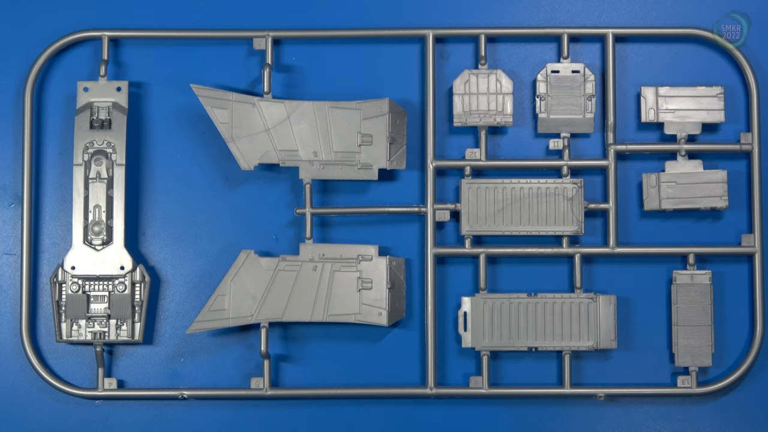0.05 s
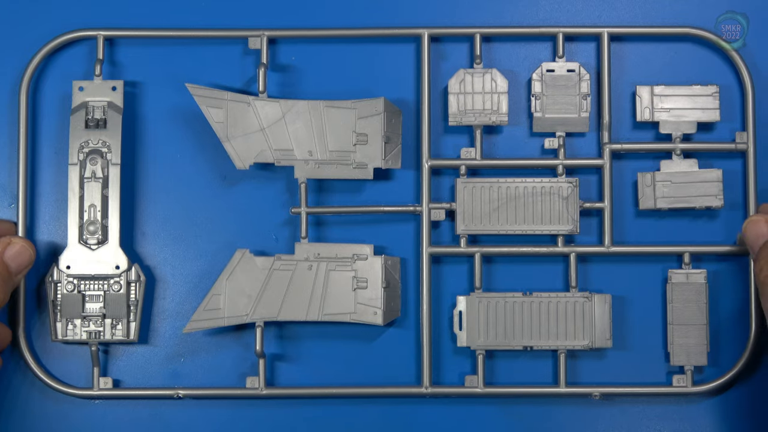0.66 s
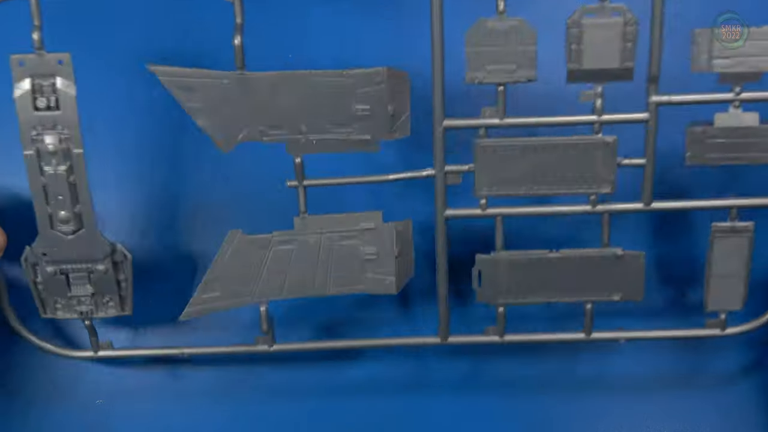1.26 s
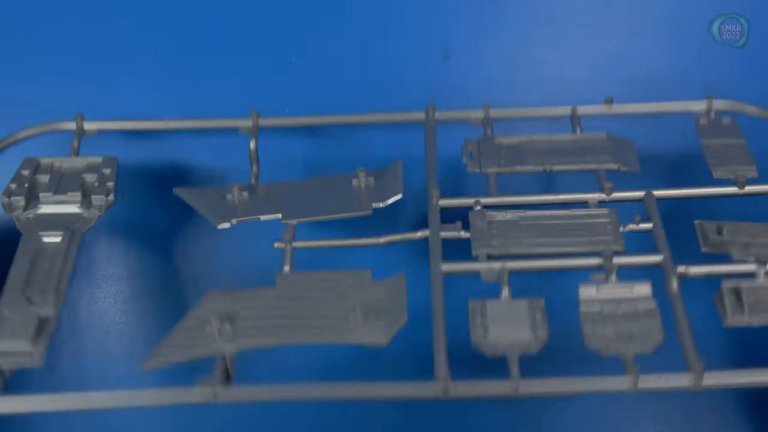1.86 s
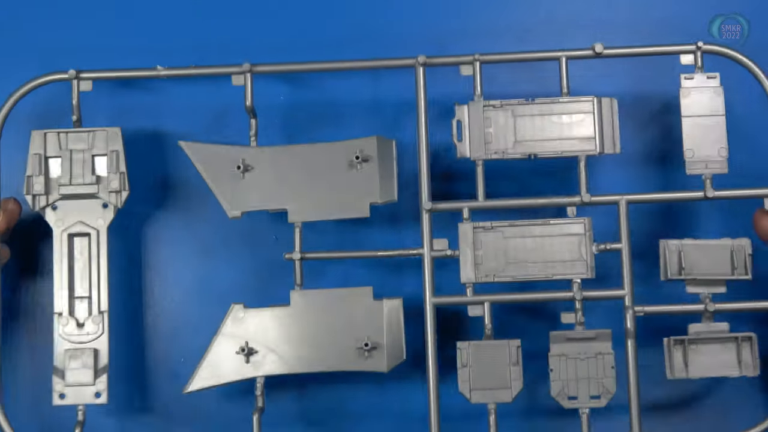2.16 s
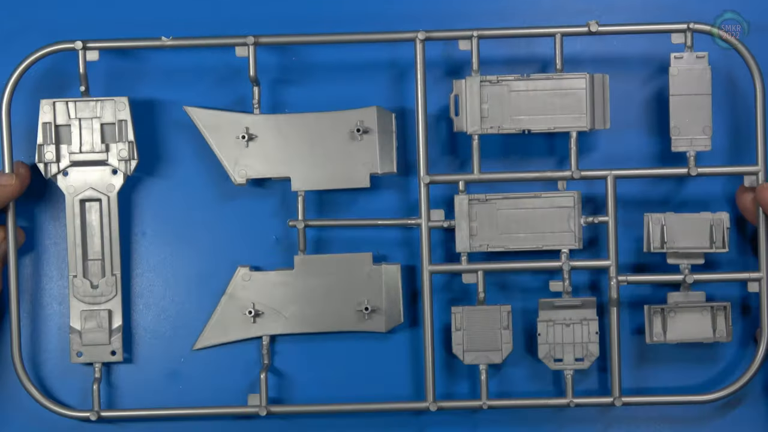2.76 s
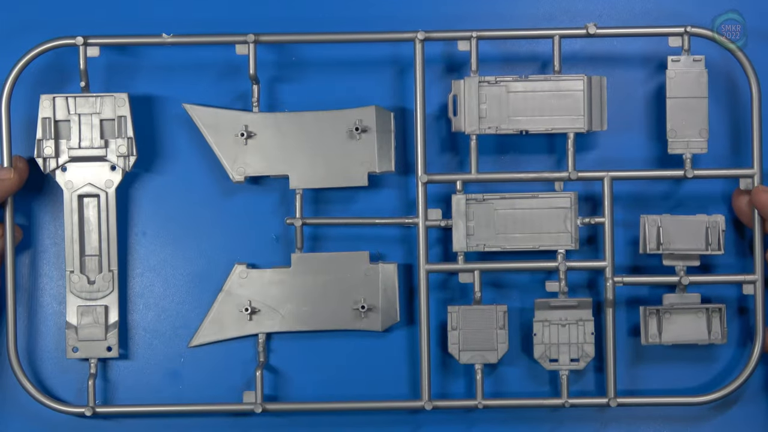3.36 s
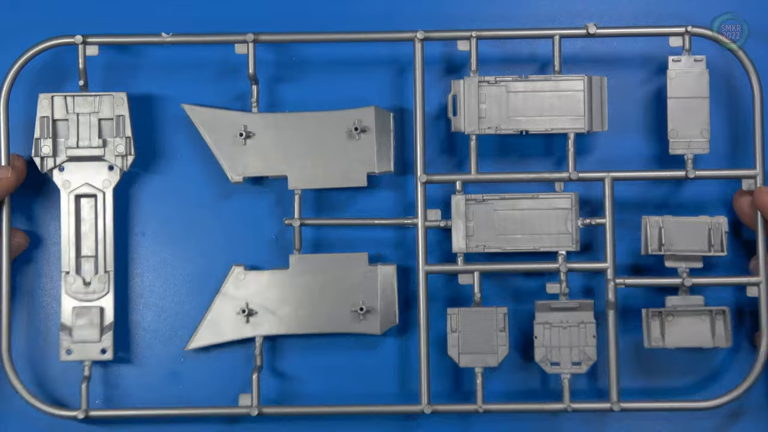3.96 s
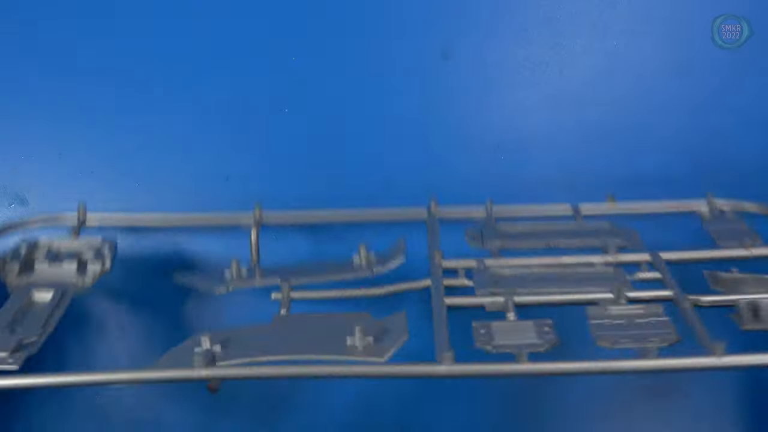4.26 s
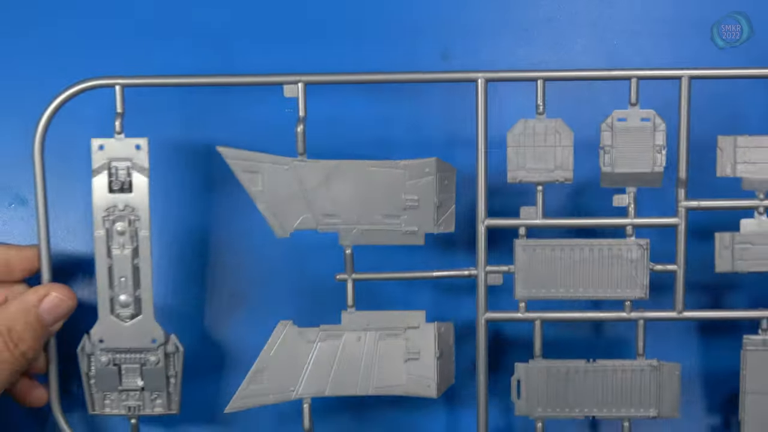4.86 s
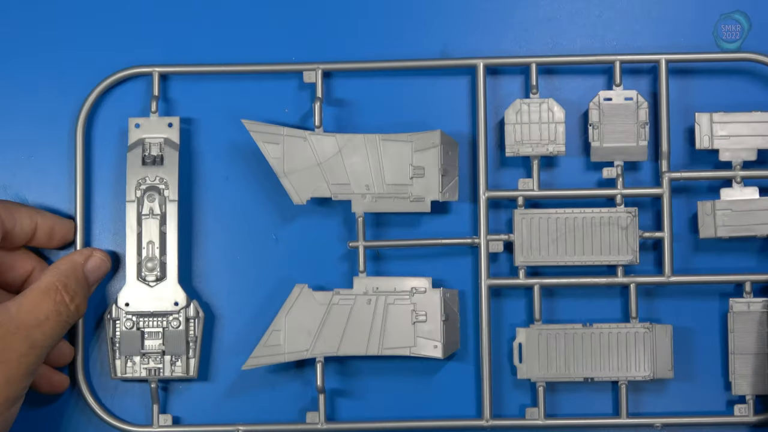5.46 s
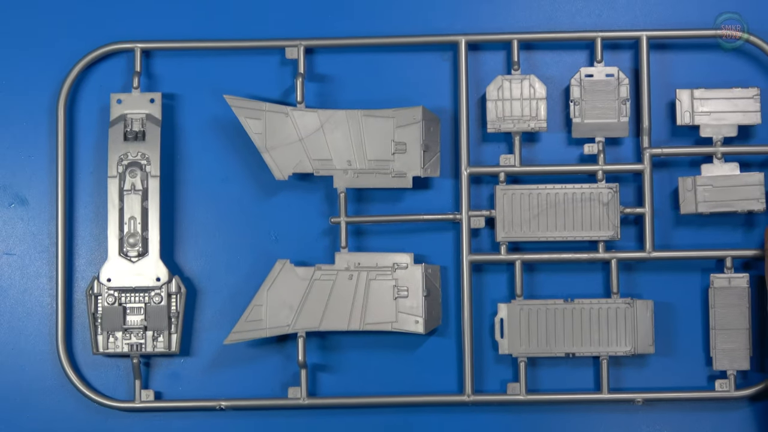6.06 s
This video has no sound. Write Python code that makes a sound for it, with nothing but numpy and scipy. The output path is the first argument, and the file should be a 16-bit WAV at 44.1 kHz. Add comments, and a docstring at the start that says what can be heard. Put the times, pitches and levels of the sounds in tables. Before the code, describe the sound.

A faint motor hums and whines in a small room, slowly growing. Near the microphone, soft thuds and a low groan of skin on a table give way to light rustling and a sharp click from a thin plastic parts frame. A hard knock bounces a few times. The frame rustles and ticks again, is laid down with a clack and a tap, and shifts under dragging fingers.

```python
"""Handling a plastic sprue

Close up, a sprue of model parts is lifted off a tabletop, turned over, turned back and laid down.
Fingers thud and drag on the table and rustle along the frame; the frame flexes and clicks, then lands
with a clack and a second tap. Midway something knocks and bounces on the table. Under it all, a motor
hums and whines faintly in the small room."""
import sys
import numpy as np
from scipy import signal
from scipy.fft import rfft, irfft
from scipy.io import wavfile

SR = 44100
rng = np.random.default_rng(int(sys.argv[2]) if len(sys.argv) > 2 else 0)


def master_out(mix):
    """Clip the mix to full scale and print it as 16-bit PCM to the path in sys.argv[1]."""
    frames = np.transpose(np.atleast_2d(mix))
    ceiling = np.clip(frames, -1, 1)
    pcm = np.round(ceiling * 32767).astype(np.int16)
    wavfile.write(sys.argv[1], SR, pcm)


N = 270200

# colour of the room tone: (frequency [Hz], relative density [dB])
ROOM_TONE = [(20, 1), (35, -7), (60, -6.5), (85, -7), (120, 1.5), (150, -16.5), (185, -8.5), (230, -21.5),
             (370, -13.5), (470, -23), (1200, -23), (1900, -25.5), (2550, -24.5), (3200, -26.5),
             (7000, -30), (16000, -35.5)]
# slow rise of room tone and hum: (time [s], base level [dB])
BED_SWELL = [(0, -54), (1.2, -52.5), (2, -51), (3.5, -50), (4.8, -47), (6.13, -44)]
# mains harmonics, fundamental first: (level over the swell [dB])
HUM_HARMONICS = [5.5, 8, -1.5, -12.5, -9, -7, -17.5, -29.5, -15.5]
# partials of the motor whine: (frequency [Hz], relative level [dB], phase waver [rad])
WHINE_PARTIALS = [(495, -12, .5), (592, -13, 1.2), (1043, -18, 1), (1172, -12, 1), (1297, -15, 1.5),
                  (2462, -18, 1), (2536, -7, 2.5)]
# the whine comes and goes: (time [s], base level [dB])
WHINE_SWELL = [(0, -57.5), (1, -55.5), (2, -52.5), (2.7, -50.5), (3.4, -50), (3.9, -51), (4.6, -50.5),
               (6.13, -52)]

# modes of the tabletop: (frequency [Hz], relative level [dB], t60 before sustain scaling [s])
TABLE_MODES = [(71, 11, 0.12), (102, 5.5, 0.22), (119.6, 3.5, 0.088), (189, 3.5, 0.11), (230, -1, 0.091),
               (287.5, 0, 0.17), (387, -2.5, 0.031)]
# modes of the sprue: (frequency [Hz], relative level [dB], t60 before sustain scaling [s])
SPRUE_MODES = [(552, -6, .07), (742, -3, .08), (835, -7, .09), (986, -1, .07), (1090, -4, .06),
               (1158, -3, .06), (1635, 1, .08), (1861, -2, .08), (2283, -2, .07), (2640, -3, .07),
               (2890, -4, .07), (3117, -3, .07), (3328, -3, .06), (3590, -2, .07), (3925, 0, .08),
               (4025, -3, .07), (4740, -6, .05), (5430, -5, .06), (5760, -7, .05), (6450, -9, .05),
               (6850, -8, .05)]
# sprue or finger meets the table: (time [s], thud [dB], hollow [dB], ring [dB], touched spot [Hz])
TAPS = [(0.0232, -35.5, -39, -50.5, 2460), (0.5245, -23, -40.5, -46, 3020), (0.54, -20, -45, -43.5, 2670),
        (0.9692, -33, -39.5, -65, 2500), (5.2326, -15, -21, -19.5, 2500), (5.3742, -24, -57, -38, 4200),
        (5.4141, -19.5, -25, -28, 4300), (5.589, -27, -35.5, -61, 2280), (6.046, -26, -39, -41.5, 4200)]

# hands and sprue shift on the table: (start [s], length [s], rumble [dB], scuff [dB])
SHIFTS = [(0.554, 0.024, -28.5, -37.5), (0.642, 0.032, -39.5, -33), (0.912, 0.014, -32, -42.5),
          (1.051, 0.049, -56, -31), (3.982, 0.078, -32, -45.5), (5.113, 0.094, -36.5, -63),
          (5.252, 0.21, -28, -35), (5.497, 0.1, -31.5, -38.5), (5.655, 0.074, -42, -30.5),
          (5.791, 0.062, -30.5, -37), (5.887, 0.064, -43, -29.5), (6.038, 0.072, -35, -32)]
# colour of the table's rumble: (frequency [Hz], relative density [dB])
RUMBLE = [(30, -9), (55, 15), (80, 16), (125, 17), (190, 1.5), (300, -6.5), (450, -39)]
# colour of the scuff: (frequency [Hz], relative density [dB])
SCUFF = [(150, 5), (200, 12.5), (320, 5.5), (440, 1.5), (540, 4), (660, -3), (820, -3), (1200, -8.5),
         (1800, -19.5), (3500, -59)]
# colour of the frame's rustle: (frequency [Hz], relative density [dB])
RUSTLE = [(900, -13), (1800, -1.5), (2900, 0.5), (3700, 0), (4400, -2), (5600, -4), (6900, -4),
          (12000, -40)]
# the frame flexes and clicks: (time [s], ring [dB], touched spot [Hz], rise [s])
CLICKS = [(0.5557, -47, 4220, .0007), (0.6327, -41.5, 4400, 0.00046), (1.8302, -28.5, 3730, 0.00042),
          (2.029, -53, 3840, .003), (4.4751, -39, 3650, 0.0034), (4.508, -37, 3680, 0.0017),
          (4.6797, -42, 5570, 0.0018), (5.344, -39.5, 4500, .002), (5.3964, -38, 4200, 0.0016)]
# skin drags on the table, one list a stroke: (time [s], slip rate [1/s], base level [dB])
DRAGS = [
    [(.645, 125, -31.5), (.69, 117, -24.5), (.735, 70, -26), (.82, 90, -27), (.865, 74, -22),
     (.892, 92, -29), (.908, 128, -24), (.93, 73, -35), (.965, 83, -27)],
    [(5.64, 200, -30), (5.685, 154, -27.5), (5.7, 294, -27.5), (5.715, 293, -19.5), (5.745, 300, -40)],
]

# fingers brush the frame: (start [s], length [s], base rustle [dB], base hiss [dB], runner pitch [Hz])
BRUSHES = [(1.065, 0.043, -53, -64, 2550), (1.345, 0.039, -50, -52, 3500), (1.482, 0.14, -49, -55.5, 3650),
           (2.275, 0.053, -56, -51, 3680), (3.038, 0.017, -50, -48.5, 3650),
           (3.988, .055, -44.5, -46.5, 4030), (4.11, 0.088, -45.5, -53, 3550),
           (4.237, 0.074, -42, -42.5, 3470), (4.434, 0.1, -46, -51.5, 3580), (5.213, 0.067, -41, -48, 3400),
           (5.51, 0.035, -44, -50, 3520), (5.654, 0.039, -33, -41.5, 3230),
           (5.788, 0.061, -42.5, -50, 3370), (5.91, 0.24, -43.5, -56, 2550)]
# colour of rubbed skin: (frequency [Hz], relative density [dB])
SKIN_HISS = [(3000, -12.5), (5500, -2.5), (7200, 1), (10000, 0.5), (15500, -19)]
# the bouncing knock: (time [s], table thud [dB], base clack level [dB])
BOUNCES = [(2.7509, -19, -27.5), (2.8079, -25.5, -38.5), (2.8749, -26, -33.5), (2.9167, -34, -42.5)]
# modes of the knock: (frequency [Hz], relative level [dB], t60 before sustain scaling [s])
KNOCK_MODES = [(585, -4, .08), (856, -10, .05), (975, -13, .04), (1167, -13, .08), (1858, -14, .09),
               (2255, -19, .08), (2445, -5, .08), (2680, -8, .05), (2960, -5, .07), (3325, -2, .06),
               (3480, -6, .07), (3660, -4, .05), (3910, -4, .05), (4272, -9, .07), (4555, -12, .08),
               (5210, -13, .07), (5780, -12, .07)]

TIME = np.arange(N) / SR
HIT_TIME = np.arange(int(.4 * SR)) / SR   # time axis of a one-shot


def from_db(db):
    """Decibels to gain."""
    return 10 ** (np.asarray(db) / 20)


def rms_one(x):
    """Scale to unit power."""
    return x / np.sqrt(np.mean(x ** 2) + 1e-20)


def punch_one(x):
    """Scale a hit to the energy of 20 ms at unit power."""
    return x / np.sqrt(np.sum(x ** 2) / (.02 * SR) + 1e-20)


def band(x, low_hz, high_hz, order=2):
    """Causal band-pass."""
    sos = signal.butter(order, [low_hz, min(high_hz, .45 * SR)], "band", fs=SR, output="sos")
    return signal.sosfilt(sos, x)


def resonance(x, hz, width_hz):
    """A single resonance with unity gain at its peak."""
    r = np.exp(-np.pi * width_hz / SR)
    feedback = [1, -2 * r * np.cos(2 * np.pi * hz / SR), r * r]
    return signal.lfilter(np.array([1, 0, -1]) * (1 - r * r) / 2, feedback, x)


def coloured(x, spectrum):
    """EQ a noise along a log-frequency curve; unit power."""
    knots_hz, db = np.transpose(spectrum)
    hz = np.fft.rfftfreq(N, 1 / SR)
    eq_db = np.interp(np.log(hz + 1e-9), np.log(knots_hz), db)
    return rms_one(irfft(rfft(x) * from_db(eq_db), N))


def curve(rows, column):
    """One column of a table as an automation curve."""
    return np.interp(TIME, np.array(rows)[:, 0], np.array(rows)[:, column])


def stroke(rows, fade_s=.011):
    """Gain of one drag, fading to silence either side."""
    inside_s = np.minimum(TIME - rows[0][0], rows[-1][0] - TIME)
    return from_db(curve(rows, column=2)) * np.clip(1 + inside_s / fade_s, 0, 1)


def envelope(start_s, length_s, attack_s, release_s, growth_db=0):
    """Exponential attack and release around a hold that climbs by growth_db to -growth_db / 2."""
    t = TIME - start_s
    outside = np.maximum(-t / attack_s, 0) + np.maximum((t - length_s) / release_s, 0)
    return np.exp(-np.minimum(outside, 20)) * from_db(growth_db * (np.clip(t / length_s, 0, 1) - 1.5))


def drift(rate_hz, size=8192):
    """Smooth random modulation with a spread of 1."""
    hz = np.fft.rfftfreq(size, N / SR / size)
    slow = rms_one(irfft(rfft(rng.standard_normal(size)) / (1 + (hz / rate_hz) ** 2), size))
    return np.interp(np.arange(N) * size / N, np.arange(size), slow)


def add(out, start_s, sound):
    """Mix a one-shot in at its cue."""
    start = max(round(start_s * SR), 0)
    out[start:start + len(sound)] += sound[:N - start]


def motor_and_room_tone(mains_hz=60, air_db=9.5, hum_waver_rad=.12, whine_swing_db=2.5):
    """The bed: mains hum and room tone swell together while the motor's whine wavers above them."""
    turn = 2 * np.pi * TIME
    hum = sum(from_db(db) * np.sin(k * mains_hz * turn + rng.uniform(0, 2 * np.pi)
                                   + hum_waver_rad * drift(10))
              for k, db in enumerate(HUM_HARMONICS, start=1))
    whine = sum(from_db(db) * np.sin(hz * turn + waver * drift(3)) for hz, db, waver in WHINE_PARTIALS)
    steady = np.sqrt(2) * hum + from_db(air_db) * coloured(rng.standard_normal(N), ROOM_TONE)
    whine_gain = np.sqrt(2) * from_db(curve(WHINE_SWELL, column=1) + whine_swing_db * drift(7.9))
    return from_db(curve(BED_SWELL, column=1)) * steady + whine_gain * whine


def ringing(modes, spread_db, sustain):
    """Damped modes, their t60 scaled by sustain; each hit lands elsewhere and rebalances them."""
    hz, db, t60 = np.transpose(modes)[:, :, None]
    polarity = (-1) ** np.arange(len(hz))[:, None]
    gains = polarity * from_db(db + spread_db * rng.standard_normal(hz.shape))
    decay = from_db(-60 * HIT_TIME / (sustain * t60))
    return punch_one(np.sum(gains * decay * np.sin(2 * np.pi * hz * HIT_TIME), axis=0))


def crack(t60, snap=0):
    """A noise burst for a contact's crowd of short-lived modes; snap adds a spike at the front."""
    burst = punch_one(rng.standard_normal(len(HIT_TIME)) * from_db(-60 * HIT_TIME / t60))
    return burst - snap * punch_one(1. * (HIT_TIME == 0))


def first_snap(bright_hz):
    """The single pressure pulse of two hard surfaces meeting; height 1."""
    pulse = band(band(1. * (HIT_TIME == 0), 730, bright_hz, order=1), 230, 10400)
    return pulse / np.max(pulse)


def contact(thud_db, hollow_db, ring_db, spot_hz, rise_s, spot_gain, top_db):
    """The table thuds, the frame rings and ticks; a fast rise adds a snap and a crisp top."""
    press = 1 - np.exp(-HIT_TIME / rise_s)   # a glancing touch builds more slowly
    hardness = np.exp(-(rise_s / .0014) ** 2)
    frame = from_db(-8.5) * ringing(SPRUE_MODES, spread_db=3, sustain=.86)
    frame += punch_one(band(crack(t60=.042, snap=.32), 190, 7100, order=1))
    touched = frame + spot_gain * resonance(frame, spot_hz, width_hz=350)   # nearby parts ring most
    tick_db = -47.5 + .4 * (ring_db + 39)   # the tick grows more slowly than the ring
    sound = from_db(thud_db) * ringing(TABLE_MODES, spread_db=1, sustain=.98)
    sound += from_db(hollow_db) * punch_one(band(press * frame, 380, 974))
    sound -= from_db(ring_db) * punch_one(band(press * touched, 1670, 6100))
    sound += from_db(tick_db) * punch_one(band(press * crack(t60=.025), 5800, 9100, order=1))
    sound += from_db(tick_db + top_db) * hardness * punch_one(band(press * crack(t60=.03), 6000, 17600))
    return sound - from_db(ring_db + 15) * hardness * first_snap(bright_hz=5000)


def taps():
    """Sprue or finger strikes the table, and table and frame sound together."""
    out = np.zeros(N)
    for s, thud_db, hollow_db, ring_db, spot_hz in TAPS:
        add(out, s, contact(thud_db, hollow_db, ring_db, spot_hz, .00017, spot_gain=1.3, top_db=-24))
    return out


def friction(per_s, spread_db):
    """Tiny catches of skin, at random times and of uneven size."""
    return (rng.random(N) < per_s / SR) * rng.standard_normal(N) * from_db(spread_db * drift(94))


def frame_rustle(catches, ring_gain=.36):
    """Catches of friction excite the frame's modes; unit power."""
    modes = ringing(SPRUE_MODES, spread_db=5, sustain=.42)
    ring = rms_one(signal.fftconvolve(catches, modes)[:N])
    return coloured(rms_one(catches) + ring_gain * ring, RUSTLE)


def shifts(drag_rumble_db=-7, drag_scuff_db=-18.5, rustle_db=-17.5):
    """Shifts and drags rumble and scuff on the table; the frame's rustle rides on the scuff."""
    dragging = sum(stroke(rows) for rows in DRAGS)
    rumble, scuff = from_db(drag_rumble_db) * dragging, from_db(drag_scuff_db) * dragging
    for s, length_s, rumble_db, scuff_db in SHIFTS:
        push = envelope(s, length_s, attack_s=.021, release_s=.015)
        rumble += from_db(rumble_db) * push
        scuff += from_db(scuff_db) * push
    out = rumble * coloured(friction(per_s=1000, spread_db=.4), RUMBLE)
    out += scuff * coloured(friction(per_s=6100, spread_db=2.5), SCUFF)
    return out + from_db(rustle_db) * scuff * frame_rustle(friction(per_s=7600, spread_db=4.5))


def clicks():
    """The flexing frame clicks: a bright ring with little weight behind it."""
    out = np.zeros(N)
    for s, ring_db, spot_hz, rise_s in CLICKS:
        thud_db, hollow_db = ring_db - 18, ring_db - 14
        add(out, s, contact(thud_db, hollow_db, ring_db, spot_hz, rise_s, spot_gain=2.4, top_db=1))
    return out


def drags(jitter=.029, trim_db=-.5, flutter_db=3.4, overtone_db=-14.5):
    """Skin sticks and slips unevenly, so the tabletop groans."""
    out = np.zeros(N)
    for rows in DRAGS:
        slip_hz = curve(rows, column=1) * np.exp(jitter * drift(51.7))
        phase = 2 * np.pi * np.cumsum(slip_hz) / SR
        groan = sum(from_db(overtone_db * k) * np.sin((k + 1) * phase) for k in range(3))
        out += rms_one(groan) * stroke(rows) * from_db(trim_db + flutter_db * drift(45))
    return out


def brushes(squeak_db=-9):
    """Skin gathers speed along the frame: hiss, rustle and a faint note from the rubbed runner."""
    out = np.zeros(N)
    catches = friction(per_s=7000, spread_db=2)
    frame, skin = frame_rustle(catches), coloured(catches, SKIN_HISS)
    for s, length_s, rustle_db, hiss_db, runner_hz in BRUSHES:
        squeak = from_db(squeak_db) * rms_one(resonance(catches, runner_hz, width_hz=53))
        sound = from_db(rustle_db) * (frame + squeak) + from_db(hiss_db) * skin
        out += envelope(s, length_s, attack_s=.022, release_s=.018, growth_db=3.5) * sound
    return out


def knocks(modes_db=2.5, bite_db=-3.5, body_db=-10, tick_db=-7.5, snap_db=20, octaves_per_db=.065):
    """Something hard bounces on the table: each clack has a woody thud under it."""
    out = np.zeros(N)
    for s, thud_db, clack_db in BOUNCES:
        clack = from_db(modes_db) * ringing(KNOCK_MODES, spread_db=1.2, sustain=.6)
        bite = band(crack(t60=.036, snap=.51), 2600, 2900, order=1)
        clack += from_db(bite_db) * punch_one(band(bite, 1500, 5900))
        clack += from_db(body_db) * punch_one(band(crack(t60=.052, snap=.4), 640, 1090))
        clack += from_db(tick_db) * punch_one(band(crack(t60=.025), 5600, 9300, order=4))
        clack -= from_db(snap_db) * first_snap(bright_hz=4450)
        edge_hz = 21000 * 2 ** (octaves_per_db * clack_db)   # a weaker bounce is duller
        clack = band(clack, 100, edge_hz, order=3)
        wood = punch_one(band(ringing(TABLE_MODES, spread_db=-2.5, sustain=.46), 156, 440))
        add(out, s, from_db(clack_db) * clack + from_db(thud_db) * wood)
    return out


def room(x, wet_db=-15, t60=.1, predelay_s=.0075):
    """The near walls add a short, dull tail."""
    decay = from_db(-60 * HIT_TIME / t60) * (HIT_TIME > predelay_s)
    tail = band(rng.standard_normal(len(HIT_TIME)) * decay, 125, 3000, order=1)
    return x + from_db(wet_db) * signal.fftconvolve(x, tail / np.sqrt(np.sum(tail ** 2)))[:N]


def scene():
    """A close mono mix: the handling gets a touch of room, the groans and the bed stay dry."""
    handling = taps() + clicks() + knocks() + shifts() + brushes()
    return (room(handling) + drags() + motor_and_room_tone())[None]


def record(dry):
    """Clip at full scale, then cut the top steeply at 16 kHz."""
    return signal.sosfilt(signal.ellip(10, .1, 80, 16000, fs=SR, output="sos"), np.clip(dry, -1, 1))


dry = scene()
out = record(dry)
master_out(out)
```